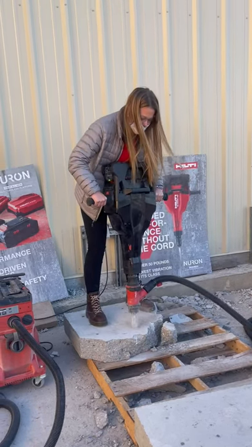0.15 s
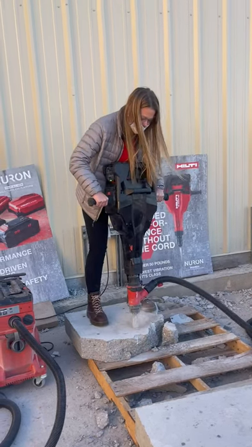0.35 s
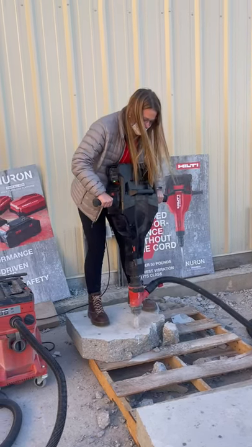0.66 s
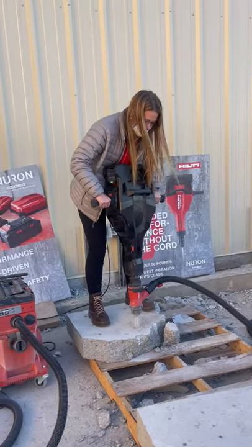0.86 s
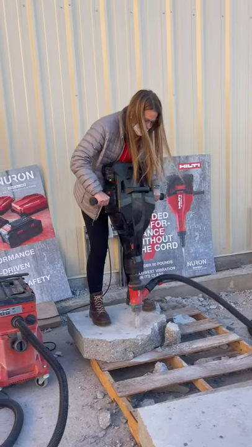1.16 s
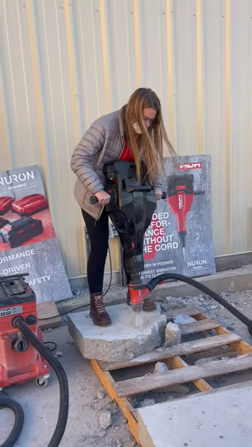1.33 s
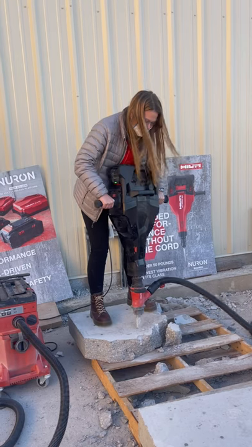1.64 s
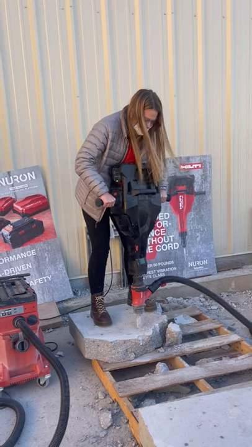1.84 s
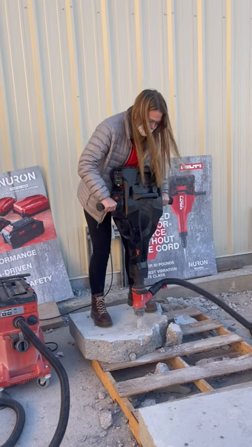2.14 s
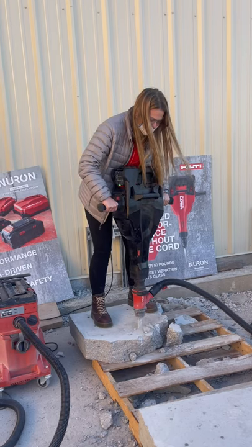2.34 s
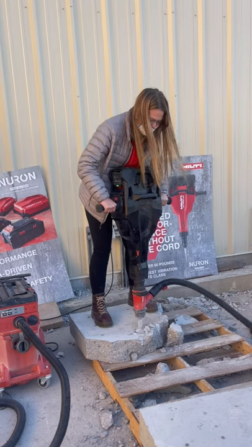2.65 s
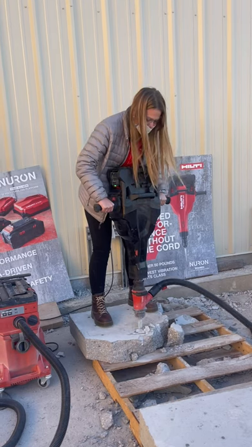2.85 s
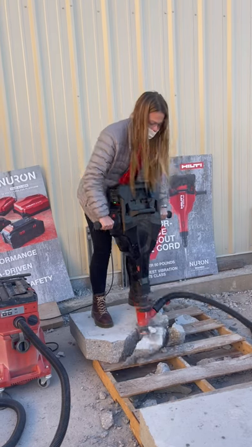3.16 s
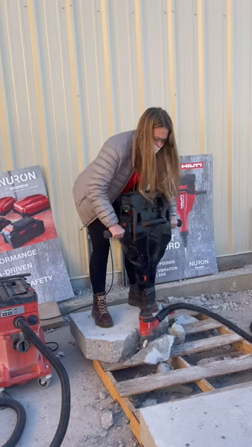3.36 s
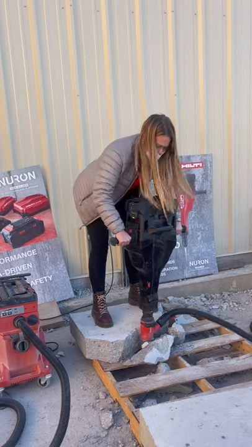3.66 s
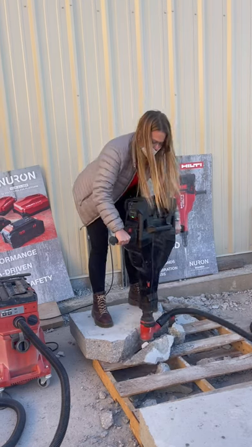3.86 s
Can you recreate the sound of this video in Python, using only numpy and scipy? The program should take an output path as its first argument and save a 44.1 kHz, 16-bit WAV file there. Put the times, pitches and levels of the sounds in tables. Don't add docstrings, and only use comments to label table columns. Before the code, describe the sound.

An electric demolition hammer pounds a concrete slab in a steady rapid rattle, with steel ringing and gritty cracking, outdoors beside a metal wall; the slab breaks, pieces knock, motor whine fades. Close phone, stereo.

```python
import sys
import numpy as np
from scipy import signal
from scipy.fft import rfft, irfft, next_fast_len
from scipy.io import wavfile
from scipy.ndimage import uniform_filter1d

SR = 44100
rng = np.random.default_rng(int(sys.argv[2]) if len(sys.argv) > 2 else 0)


def int16_out(signal):
    q = np.round(np.clip(np.atleast_2d(signal).T, -1, 1) * 32767)
    wavfile.write(sys.argv[1], SR, q.astype(np.int16))


def gain_from_db(level_db):
    decades = np.asarray(level_db, float) / 20
    return 10 ** decades


N = 176400


def read(points, hz):
    f, v = np.transpose(points)
    return np.interp(np.log(hz + 1), np.log(f + 1), v)


def colour(x, gain):
    size = next_fast_len(N + 4096)
    return irfft(rfft(x, size) * gain(np.fft.rfftfreq(size, 1 / SR)), size)[..., :N]


def noise(points):
    x = colour(rng.standard_normal(N), lambda hz: gain_from_db(read(points, hz)))
    return x / x.std()


def held(at, values):
    t = (np.arange(N + 200) - 200) / SR
    latest = np.searchsorted(at, t, "right") - 1
    return values[np.clip(latest, 0, None)]


def ring(at, size, shape, shift_hz=None):
    lead = 200
    train, turn = np.zeros(N + lead, complex), np.ones(N + lead)
    if shift_hz is not None:
        turn = np.exp(2j * np.pi * np.cumsum(shift_hz) / SR)
    index = np.round(at * SR).astype(int) + lead
    np.add.at(train, np.clip(index, 0, N + lead - 1), size)
    rung = signal.oaconvolve(train / turn, shape)[:N + lead] * turn
    return rung[lead:].real


# time in seconds, stroke number.
STROKE_TIMES = [(-.0015, 0), (.2807, 8), (.4884, 14), (.5916, 17), (.8635, 25), (.9314, 27), (1.0955, 32),
                (1.1983, 35), (1.3039, 38), (1.341, 39), (1.395, 41), (1.4921, 44), (1.7568, 52),
                (1.8562, 55), (2.6769, 80), (3.066, 92)]
# time in seconds, slab blow in dB, steel ring in dB, looseness from about -1 to 1.
CHISEL_BEARING = [(0, -0.5, 7, -0.061), (.25, -4, 5.5, 0.29), (.5, -1, 4.5, -0.49), (.8, -1.5, 4, -0.061),
                  (1, 0, 2, -1.24), (1.25, -2, 1.5, -0.58), (1.34, -6.5, 2.5, -0.44), (1.43, -1, 2, -0.73),
                  (1.8, -0.5, 1.5, -0.73), (2.05, -1, 1.5, -0.15), (2.25, -3.5, 1, 0.91),
                  (2.5, -1.5, 0.5, 0.22), (2.65, -2, 1.5, 0.44), (2.85, -2.5, 1, 0.17),
                  (2.97, -6, 2, -0.42), (3.039, -11, -4, 0.11), (3.07, -35, 4, -0.23)]
# start in seconds, thud in dB, steel ring in dB, dullness from 0 to 1.
RUBBLE_KNOCKS = [
    (3.083, -21, -1, 0.6),
    (3.0997, -6, -1.5, 0.52),
    (3.1395, -11.5, -2.5, 0.7),
    (3.171, -13, -8.5, 0.93),
    (3.224, -14.5, -33, 0.84),
    (3.248, -22.5, -22, 0.23),
    (3.287, -13.5, -35, 0.81),
    (3.34, -22, -41, 0.87),
    (3.601, -24, -30, 0.64),
]


def blows():
    s, number = np.transpose(STROKE_TIMES)
    at = np.interp(np.arange(number[-1] + 1), number, s)
    bearing_s, *bearing = np.transpose(CHISEL_BEARING)
    slab_db, steel_db, loose = [np.interp(at, bearing_s, column) for column in bearing]
    knock_s, thud_db, clink_db, dull = np.transpose(RUBBLE_KNOCKS)
    return (np.r_[at, knock_s], np.r_[slab_db, thud_db], np.r_[steel_db, clink_db],
            np.r_[loose, 0 * knock_s], np.r_[0 * at, dull])


# time in seconds, crack in dB,
# rebound ring in dB.
BLOW_CRACKS = [(0.0343, -18.5, -29), (0.0702, -24, -31), (0.1052, -23, -25), (0.1406, -21, -25),
               (0.175, -23, -32), (0.2099, -20, -29), (0.2458, -20, -29), (0.2813, -20.5, -23.5),
               (0.3147, -22, -18.5), (0.3496, -16.5, -27), (0.384, -22, -22), (0.4194, -19.5, -19.5),
               (0.4534, -22, -26), (0.4878, -18.5, -37), (0.5227, -22, -29), (0.5586, -22, -32),
               (0.5931, -21.5, -26), (0.626, -23, -25), (0.6594, -23, -31), (0.6933, -21.5, -26),
               (0.7617, -24, -25), (0.7951, -23, -30), (0.8325, -18.5, -27), (0.8629, -19, -24),
               (0.8979, -20.5, -25), (1.0969, -24, -23.5), (1.2341, -20, -22), (1.2675, -17.5, -26),
               (1.4262, -26, -27), (1.4935, -24, -22), (1.5923, -24, -27), (1.6247, -25, -35),
               (1.6571, -24, -27), (1.8253, -21, -32), (1.8572, -22.5, -24), (1.9235, -18, -25),
               (1.9879, -19, -33), (2.0522, -18, -21), (2.0862, -21.5, -27), (2.1191, -21, -22),
               (2.1515, -20, -22), (2.1859, -20, -20), (2.2179, -18, -24), (2.2513, -21, -20),
               (2.2847, -19, -19), (2.3161, -21, -19.5), (2.3496, -21, -20), (2.382, -22, -21),
               (2.4154, -19.5, -19), (2.4478, -20, -28), (2.4818, -19, -25), (2.5137, -21, -31),
               (2.5476, -18, -28), (2.6125, -13, -16), (2.7092, -23.5, -23), (2.7422, -20, -20),
               (2.7751, -20.5, -24), (2.8075, -25, -34), (2.8394, -20.5, -33), (2.8709, -20, -23)]


def hardness(at):
    soft, usual = [[-24], [-27]], [[-21], [-24.5]]
    share = [[0.82], [0.98]]
    s, crack_db, ring_db = np.transpose(BLOW_CRACKS)
    out = np.tile(soft, len(at)) * 1.
    nearest = abs(s[:, None] - at).argmin(1)
    out[:, nearest] = crack_db, ring_db
    return (out - usual) * share * (at < RUBBLE_KNOCKS[0][0])


# pitch in Hz, level in dB, time to fade by 60 dB in seconds, full swing after ms,
# dB gained per unit of looseness.
SLAB_MODES = [(180.2, -44.5, 0.17, 2.5, 1), (219.2, -41, 0.13, 6, 0.5), (282, -37, 0.1, 6.35, -1),
              (328.5, -37, 0.17, 7.47, -0.5), (470.7, -30, 0.049, 1.94, 2), (688.5, -37, 0.066, 7.08, 5),
              (985, -17, 0.052, 5.16, 1), (1109, -21, 0.032, 5.09, 2), (1227, -41.5, 0.038, 5, 3),
              (1598, -28.5, 0.073, 1.52, -1), (1740, -44, 0.037, 1.09, -9), (2100, -22, 0.018, 1.04, 4.5),
              (2121, -26, 0.09, 1.01, -3), (2221, -23.5, 0.069, 0.986, -3)]


def slab(at, db, loose, dull):
    detune, scatter_db, phase_scatter = .005, .8, .08
    split_s, split_len_s, tilt_db, sag = 2.675, 0.3, -4, 0.031
    t, out = np.arange(8000) / SR, 0
    luck = rng.standard_normal((len(at), len(SLAB_MODES), 3))
    split = np.clip((at - split_s) / split_len_s, 0, 1) * (dull == 0)
    for k, (hz, mode_db, t60, full_ms, per_db) in enumerate(SLAB_MODES):
        u = t - full_ms / 1000
        swell = np.minimum(1 + u / (full_ms / 1000), 1) ** 2
        shape = swell * gain_from_db(-60 * np.maximum(u, 0) / t60) * np.exp(2j * np.pi * hz * u)
        size_db = db + mode_db + per_db * loose + scatter_db * luck[:, k, 0]
        size_db = size_db + dull * (-31.0 - mode_db - 3.2 * np.log2(hz / 500))
        size_db = size_db + split * tilt_db * np.log2(max(hz, 600) / 900)
        phase = (phase_scatter * hz / 500 + 3 * dull) * luck[:, k, 1]
        shift_hz = hz * (detune * luck[:, k, 2] - sag * split)
        out = out + ring(at, gain_from_db(size_db) * np.exp(1j * phase), shape, held(at, shift_hz))
    return out


# pitch in Hz, level in dB.
GROUND_SPECTRUM = [(50, -15), (150, -8), (400, -8.5), (800, 8.5), (1500, -6), (2400, -6), (3200, -11.5)]


def body(at, db):
    t = np.arange(8000) / SR
    onset = np.minimum(t / 0.00037, 1)
    return ring(at, gain_from_db(db), noise(GROUND_SPECTRUM)[:8000] * onset * gain_from_db(-32.5 - 60 * t / 0.14))


# pitch in Hz, level in dB, time to fade by 60 dB in seconds, dB per unit of looseness.
STEEL_MODES = [(5980, -32, 0.051, 11), (6600, -67, 0.039, 20), (7795, -33, .07, 0), (7860, -26.5, .2, 0),
               (8370, -33, .08, 0), (9900, -30.5, 0.026, -7), (10430, -33, 0.033, -3),
               (10760, -40, 0.026, -9), (11440, -37.5, 0.067, 1.5), (11310, -37.5, 0.03, 10.5)]


def steel(at, db, loose, ring_db):
    chatter_per_s, chatter_db, chatter_t60 = 950, -12.5, 0.078
    rebound_ms, rebound_hz, rebound_db = 6.6, 9500, 8
    detune, scatter_db = .005, 2.2
    t, out = np.arange(9000) / SR, 0
    when = rng.random(round(chatter_per_s * N / SR)) * N / SR
    luck = rng.standard_normal((len(at), len(STEEL_MODES), 4))
    chatter_fade = gain_from_db(chatter_db - 60 * t / chatter_t60)
    for k, (hz, mode_db, t60, per_db) in enumerate(STEEL_MODES):
        top = hz > rebound_hz
        size = gain_from_db(db + mode_db + per_db * loose + top * ring_db + scatter_db * luck[:, k, 0])
        hit = size * np.exp(3j * luck[:, k, 1])
        bounce = top * gain_from_db(rebound_db) * size * np.exp(3j * luck[:, k, 2])
        chatter = ring(at, size, chatter_fade)[(when * SR).astype(int)]
        chatter = chatter * np.exp(2j * np.pi * rng.random(len(when)))
        times = np.r_[at, at + rebound_ms / 1000, when]
        shape = gain_from_db(-60 * t / t60) * np.exp(2j * np.pi * hz * t)
        shift_hz = held(at, detune * hz * luck[:, k, 3])
        out = out + ring(times, np.r_[hit, bounce, chatter], shape, shift_hz)
    return out


# pitch in Hz, level in dB.
CRACK_SPECTRUM = [(500, -24.5), (1500, -2.5), (2300, -12.5), (3000, -3), (5500, -6), (8500, 3),
                  (11400, 3.5), (13000, -7)]


def crack(at, db):
    snap_db, snap_t60, grit_db, grit_t60, uneven_db = -20, 0.043, -26.5, 0.062, 4
    t = np.arange(6000) / SR
    luck = np.clip(rng.standard_normal((len(at), 2)), -1.5, 2)
    snap = ring(at, gain_from_db(db + 1.3 * luck[:, 0]), gain_from_db(snap_db - 60 * t / snap_t60))
    grit = ring(at, gain_from_db(db + 1.9 * luck[:, 1]), gain_from_db(grit_db - 60 * t / grit_t60))
    bumps = np.sqrt(40) * uniform_filter1d(rng.standard_normal(N), size=40)
    grains = gain_from_db(uneven_db * bumps - 2.0)
    return (snap + grit * grains) * noise(CRACK_SPECTRUM)


def wall_echo(bright):
    smear_ms = 1.64
    t_ms, ribs = np.arange(1000) / SR * 1000, rng.standard_normal(1000)
    wall = 0
    for late_ms, db in [(5.9, -5), (12.5, -12)]:
        wall = wall + gain_from_db(db) * np.exp(-abs(t_ms - late_ms) / smear_ms) * (t_ms > late_ms)
    return signal.oaconvolve(bright, wall * ribs / np.sqrt(smear_ms * SR / 2000))[:N]


# time in seconds, whine pitch in Hz, whine in dB, octave above in dB, air rush in dB.
MOTOR_COURSE = [(0, 2997, -75, -7, -32.5), (3.05, 2967, -72, -8, -32.5), (3.2, 3000, -59, -6, -43),
                (3.25, 3030, -46.5, -17, -43), (3.301, 3033, -55.5, -3, -43.5),
                (3.38, 3000, -45.5, -10, -45), (3.45, 2975, -60, -4, -44.5), (3.5, 2968, -55, -1, -44.5),
                (3.549, 2946, -66, 11, -45.5), (3.62, 2900, -56, -1, -46), (3.67, 2890, -60, 0, -42.5),
                (3.753, 2860, -53, 1, -43), (4, 2782, -57, -1, -42.5)]
# multiple of the whine pitch, level in dB.
WHINE_TONES = [(.2, -10), (.9, -9), (1, -1), (2, -1), (4, -22)]
# pitch in Hz, level in dB.
AIR_SPECTRUM = [(40, -9), (200, 1.5), (500, -1.5), (1500, 2.5), (3000, -4), (8000, -5.5), (11500, 3),
                (13500, -60)]


def motor():
    t = np.arange(N) / SR
    course_s, *course = np.transpose(MOTOR_COURSE)
    hz, whine_db, octave_db, air_db = [np.interp(t, course_s, column) for column in course]
    out = gain_from_db(air_db) * noise(AIR_SPECTRUM)
    for k, db in WHINE_TONES:
        flutter = uniform_filter1d(rng.standard_normal((2, N)), 1500, axis=1) * np.sqrt(1500)
        turns = np.cumsum(k * hz * (1 + .0008 * flutter[0])) / SR
        tone_db = whine_db + db + (k == 2) * octave_db + 5.0 + 1.5 * flutter[1]
        out = out + gain_from_db(tone_db) * np.sin(2 * np.pi * turns)
    return out


# pitch in Hz, level in dB.
WIND_SPECTRUM = [(20, -5), (60, -3), (130, -5), (250, -7), (500, -40)]


def wind():
    apart = 0.28 * np.array([noise(WIND_SPECTRUM), noise(WIND_SPECTRUM)])
    return gain_from_db(-60.5) * (noise(WIND_SPECTRUM) + apart)


# pitch in Hz, left minus right in dB.
BLOW_BALANCE = [(100, .4), (270, 2), (450, 2.5), (800, 9), (1150, 9), (1700, 0), (2300, -2), (5500, 0)]
# pitch in Hz, left minus right in dB.
MOTOR_BALANCE = [(60, .5), (290, 2), (640, 5.5), (1100, 4), (1800, 0)]
# pitch in Hz, lead in radians.
LEFT_LEAD = [(1900, .17), (4300, 2), (4850, 3.14), (5500, 5.6), (6800, 6.8), (8500, 9.1), (9500, 9.5),
             (12500, 11.8)]


def ports(x, balance):
    yard_db, yard_t60, yard_hz = -20, .13, [350, 5840]
    side = np.array([[.5], [-.5]])
    f, lead = np.transpose(LEFT_LEAD)
    near = colour(x[None], lambda hz: gain_from_db(side * read(balance, hz))
                  * np.exp(1j * side * np.interp(hz, f, lead)))
    t = np.arange(12000) / SR
    tail = rng.standard_normal((2, 12000)) * gain_from_db(-60 * t / yard_t60) * (t > .008)
    tail = signal.lfilter(*signal.butter(2, yard_hz, "band", fs=SR), tail)
    scatter = signal.fftconvolve(x[None], tail / np.linalg.norm(tail[0]), axes=1)[:, :N]
    return near + gain_from_db(yard_db) * scatter


def scene():
    at, slab_db, steel_db, loose, dull = blows()
    luck = .7 * rng.standard_normal(len(at))
    crack_db, ring_db = hardness(at)
    snap_db = 1.03 * slab_db + 0.36 * steel_db + crack_db + 1.2 * loose
    bright = steel(at, steel_db + luck, loose, ring_db) + crack(at, snap_db)
    low = slab(at, slab_db + luck, loose, dull) + body(at, slab_db + luck)
    breaker = low + bright + wall_echo(bright)
    return ports(breaker, BLOW_BALANCE) + ports(motor(), MOTOR_BALANCE) + wind()


# pitch in Hz, level in dB.
MIC_RESPONSE = [(25, -19), (55, -1), (11900, 0), (12500, -15), (13650, -30), (14300, -22), (14850, -5),
                (15600, -32)]


def microphone(x):
    return colour(x, lambda hz: gain_from_db(read(MIC_RESPONSE, hz)))


# from Hz, to Hz, percent of patches muted in the sum of both ports.
MUTED_BANDS = [
    (4550, 5150, 22),
    (8500, 9700, 52),
    (12000, 16500, 84),
]


def gate(x):
    follows, wander_db = .8, 9
    turn = np.array([[1, 1], [1, -1]])
    hz, _, z = signal.stft(turn @ x / 2, SR, nperseg=1024)
    power = uniform_filter1d(abs(z) ** 2, size=9, axis=1)
    power = uniform_filter1d(power, size=3, axis=2)
    wander = uniform_filter1d(rng.standard_normal(z.shape[2]), size=4) * 2
    loudness = uniform_filter1d(power.sum((0, 1)), size=9)
    power = power / (loudness ** follows * gain_from_db(wander_db * wander))
    shut = 0
    for lo, hi, share in MUTED_BANDS:
        band = (hz > lo) & (hz < hi)
        faint = power < np.percentile(power[0, band], share)
        shut = shut + (band[:, None] & faint)
    return turn @ signal.istft(z * (1 - shut), SR, nperseg=1024)[1][:, :N]


def low_pass(x):
    return signal.sosfilt(signal.butter(12, 16310, fs=SR, output="sos"), x)


def record(dry):
    mix = gate(microphone(dry))
    return low_pass(mix)


dry = scene()
out = record(dry)
int16_out(out)
```